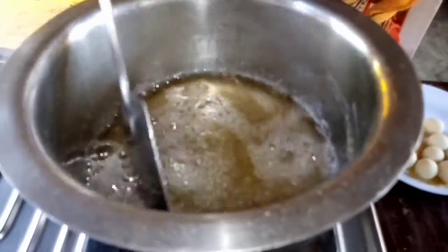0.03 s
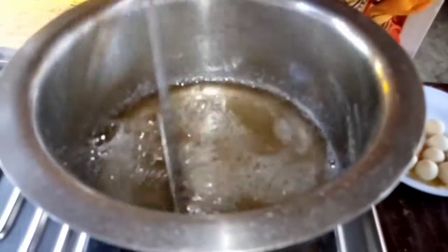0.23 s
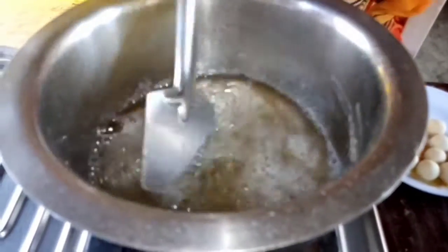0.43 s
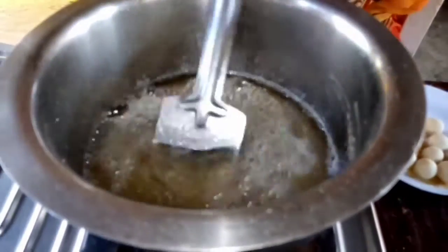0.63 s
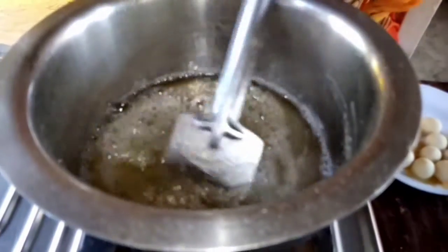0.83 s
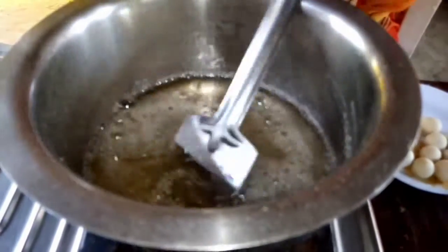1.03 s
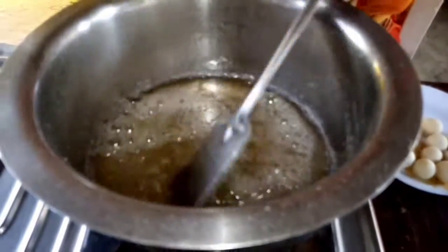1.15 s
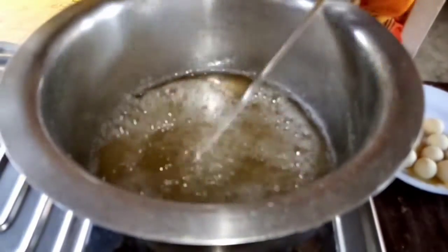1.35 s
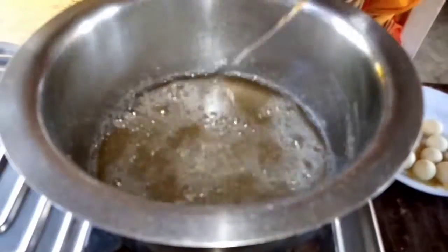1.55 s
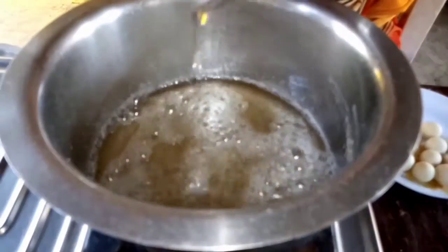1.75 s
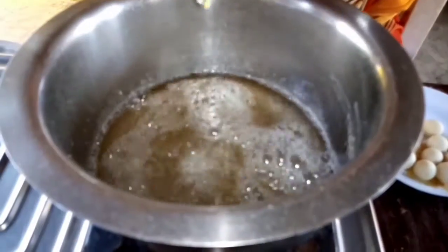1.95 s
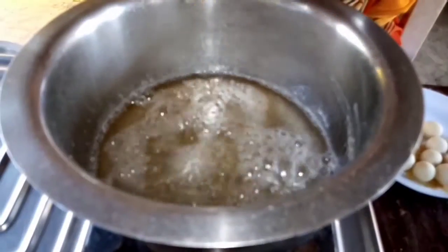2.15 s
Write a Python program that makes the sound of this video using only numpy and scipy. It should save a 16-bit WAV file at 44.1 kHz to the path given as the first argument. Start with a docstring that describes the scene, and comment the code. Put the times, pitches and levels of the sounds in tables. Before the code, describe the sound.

Sugar syrup fizzes and bubbles in a steel pot, close by. A metal spatula chatters on the bottom, clangs against the wall, then scrapes and taps lightly. The foam keeps hissing over a low stove rumble.

```python
"""A metal spatula stirs sugar syrup that fizzes and bubbles in a steel pot, close by. It strikes the syrup-
damped bottom and chatters to rest, clangs on the bare wall, then scrapes and taps along it. Bursting bubbles
keep the foam hissing; the blade sweeps a sliding resonance through the sizzle, and one faint, narrow tone
sounds. Larger bubbles plop above the stove's low rumble, and the room booms just after the knocks."""
import sys
import numpy as np
from scipy import signal
from scipy.fft import rfft, irfft
from scipy.io import wavfile

SR = 44100
rng = np.random.default_rng(int(sys.argv[2]) if len(sys.argv) > 2 else 0)


def file_out(sig):
    """Save sig as 16-bit WAV at sys.argv[1]."""
    # one column per channel
    cols = np.atleast_2d(sig).T
    # limit, then scale
    lim = np.clip(cols, -1, 1)
    pcm = np.round(lim * 32767).astype(np.int16)
    wavfile.write(sys.argv[1], SR, pcm)


N = 97020
T = np.arange(N) / SR
RING_T = T[:int(1.2 * SR)]


def undb(db):
    """Decibels to gain."""
    return 10 ** (np.asarray(db) / 20)


def level(x, db):
    """Set the rms level."""
    return x * undb(db) / np.sqrt(np.mean(x ** 2) + 1e-30)


def fader(points):
    """Gain ride through (time [s], level [dB]) points."""
    return undb(np.interp(T, *np.array(points).T))


def decay(t60):
    """Exponential tail, 60 dB down after t60 seconds."""
    return np.exp(-np.log(1000) * RING_T / t60)


def eq(x, points):
    """Unity-power EQ through (frequency [Hz], gain [dB]) points, rolling off below the first."""
    hz, db = np.array(points, float).T
    f = np.maximum(np.fft.rfftfreq(2 * N, 1 / SR), 1)
    gain = undb(np.interp(np.log(f), np.log(hz), db))
    gain /= np.sqrt(1 + (.5 * hz[0] / f) ** 4)
    cepstrum = irfft(np.log(level(gain, 0)))
    cepstrum[1:N] *= 2  # minimum phase: no ringing ahead of an attack
    cepstrum[N + 1:] = 0
    return irfft(rfft(x, 2 * N) * np.exp(rfft(cepstrum)))[:N]


def resonate(x, hz, width_hz):
    """One resonant band-pass."""
    return signal.lfilter(*signal.iirpeak(hz, hz / width_hz, fs=SR), x)


def add(out, x, start):
    """Mix a sound in from a start time."""
    i = int(start * SR)
    out[i:i + len(x)] += x[:N - i]


def clicks(per_s, spread_db):
    """Random clicks, most small and a few large."""
    impulses = (rng.random(N) < per_s / SR) * rng.choice([-1, 1], N)
    return impulses * undb(spread_db * np.minimum(rng.exponential(size=N), 4))


def crack(t60, tail_db, tail_t60):
    """A noise burst for the dense, short modes of a hit and their longer tail."""
    return rng.standard_normal(len(RING_T)) * (decay(t60) + undb(tail_db) * decay(tail_t60))


def ring(modes):
    """Modes struck once, each dying away from a random phase."""
    return sum(undb(db) * decay(t60) * np.sin(2 * np.pi * (hz * RING_T + rng.random()))
               for hz, db, t60 in modes)


# swell of the boil, for fizz and spits (time [s], level [dB])
BOIL_RIDE = [(0, 1), (.35, 4), (.52, 1), (.85, -1), (1.1, 1), (1.3, 2), (1.6, 2.5), (1.7, 1), (1.9, 2.5),
             (2.2, 1)]
# sizzling tone of the foam (frequency [Hz], gain [dB])
FIZZ_EQ = [(800, -11), (1100, -19), (1500, -11), (2200, -11.5), (2700, -4), (3500, -4), (4500, -1),
           (5500, 1), (6600, 0.5), (7300, -8), (8300, -11.5), (11000, -16), (13600, -10), (14900, -3),
           (15800, -2.5)]
POPS_PER_S = 4000


def fizz():
    """Tiny bubbles burst by the thousand, each leaving a brief hiss."""
    pops = level(clicks(POPS_PER_S, spread_db=2.5), db=-62.5)
    hiss_envelope = signal.fftconvolve(np.abs(np.tile(pops, 2)), decay(t60=.021))[N:2 * N]
    hiss = level(rng.standard_normal(N) * hiss_envelope, db=-56)
    return eq(pops + hiss, FIZZ_EQ) * fader(BOIL_RIDE)


# sparkle of snapping bubbles (frequency [Hz], gain [dB])
SPIT_EQ = [(5000, -8), (7500, -18), (10000, 1), (13600, -14.5), (14900, 7), (15800, 3)]


def spits():
    """Bubbles at the top of the foam snap open in short, bright crackles."""
    snaps = np.abs(clicks(per_s=330, spread_db=4))
    envelope = signal.fftconvolve(snaps, decay(t60=.0047))[:N]
    crackle = eq(envelope * rng.standard_normal(N), SPIT_EQ)
    return level(crackle, db=-64.5) * fader(BOIL_RIDE)


# hollow resonances of the air in the pot (frequency [Hz], width per pass [Hz], gain [dB])
AIR_MODES = [(467.4, 106, -4), (597.5, 80, 3.5), (669.6, 104, 2), (1259, 66, -4.5)]


def bubbles():
    """Larger bubbles plop and ring the air in the pot."""
    plops = clicks(per_s=250, spread_db=1)
    hollow = sum(undb(db) * resonate(resonate(plops, hz, width), hz, width)  # twice for steep sides
                 for hz, width, db in AIR_MODES)
    return level(hollow, db=-65)


# low-end weight of stove and room (frequency [Hz], gain [dB])
LOW_END_EQ = [(25, -23), (60, -8.5), (100, -6), (150, -0.5), (240, -3), (330, -17), (450, 1), (900, -34.5)]
# stove rumble, ridden up for the room's boom after the knocks (time [s], level [dB])
LOW_END_RIDE = [(0, -75), (.24, -67), (.285, -57), (.42, -66.5), (.6, -71.5), (.71, -55.5), (.87, -69),
                (1.3, -65), (1.55, -66.5), (1.85, -64), (1.98, -68), (2.15, -66)]


def stove_and_room():
    """Low stove rumble, with the room's low boom blooming just after the spatula's knocks."""
    noise = eq(rng.standard_normal(N), LOW_END_EQ)
    low_end = signal.sosfilt(signal.butter(2, 500, fs=SR, output="sos"), noise)
    return level(low_end, db=0) * fader(LOW_END_RIDE)


# the spatula chattering to rest on the bottom (time [s], level [dB])
BOTTOM_HITS = [(.2153, -2), (.2333, -4.5), (.249, -5.5), (.262, -11), (.272, -20.5), (.279, -16),
               (.286, -24.5), (.333, -21), (0.348, -21.5), (.372, -31), (0.451, -30.5)]
# tone of a knock on the bottom (frequency [Hz], gain [dB])
KNOCK_EQ = [(90, -36), (180, -23), (300, -8), (450, -6.5), (620, 3.5), (850, -3), (1060, -7.5),
            (1280, -2.5), (1600, -10.5), (2100, -7.5), (2550, -5), (3000, -6), (3600, -12.5), (4700, -2.5),
            (6700, -12.5), (7500, -18), (9000, -22), (13000, -31), (15500, -16)]
# ring of the filled pot (frequency [Hz], level [dB], 60 dB decay time [s])
POT_MODES = [(495, -6.5, 0.55), (577.5, -2.5, 1), (631, -5, 0.74), (713, 2, 0.12), (850, 4, 0.22),
             (1214, -13, 0.45), (1527, 1.5, 0.15), (1610, -6.5, 0.18), (2590, 5.5, 0.2), (2900, -21, 0.14),
             (3073.7, 8.5, 0.12), (4890, -5, 0.54), (5522.6, 2, 0.13), (6696, 2, .16)]
KNOCK_DECAY = dict(t60=.037, tail_db=-12, tail_t60=.33)
KNOCK_GAIN_DB, POT_GAIN_DB = -25.5, -43.5


def knocks():
    """Each bounce on the bottom cracks and briefly rings the filled pot."""
    attacks, rings = np.zeros((2, N))
    for start, db in BOTTOM_HITS:
        add(attacks, undb(db) * crack(**KNOCK_DECAY), start)
        add(rings, undb(db) * ring(POT_MODES), start)
    return undb(KNOCK_GAIN_DB) * eq(attacks, KNOCK_EQ) + undb(POT_GAIN_DB) * rings


# bright edge of metal meeting metal (frequency [Hz], gain [dB])
TICK_EQ = [(5000, -14), (7500, 9.5), (10000, 5), (13600, -2), (15300, 7.5)]
TICK_GAIN_DB, TICK_DB_PER_HIT_DB = -37, .7


def ticks():
    """Every hit on the bottom or the wall starts with a short, very bright tick."""
    out = np.zeros(N)
    for start, db, *_ in BOTTOM_HITS + WALL_HITS:
        tick = rng.standard_normal(len(RING_T)) * decay(t60=.025)
        add(out, undb(db * TICK_DB_PER_HIT_DB) * tick, start)
    return undb(TICK_GAIN_DB) * eq(out, TICK_EQ)


# the blade hitting the wall (time [s], clang level [dB], thud level [dB])
WALL_HITS = [(0.549, 4, -25), (.552, -2.5, -34), (0.559, 1.5, -21.5), (.682, -9.5, -10.5), (.689, -6, -11),
             (.700, -8.5, -17.5), (0.716, -3, -11.5), (.726, -23, -9.5), (.732, -8.5, -32),
             (.760, -20, -36), (0.793, -11.5, -25), (.949, -18, -19.5), (0.965, -19, -26),
             (.993, -21, -18.5), (1.064, -23, -21.5)]
# tone of a tap on the wall (frequency [Hz], gain [dB])
TAP_EQ = [(600, -15), (950, -35), (1250, -11), (1600, -21), (1900, -2.5), (2350, -17), (2600, -7.5),
          (3100, -4.5), (3900, -8), (4600, -4.5), (5400, 0.5), (6000, -2), (6650, 7), (7200, -24),
          (8200, -10.5), (8700, -21.5), (11500, -33), (15500, -22)]
# ring of the bare steel, for taps and scrapes (frequency [Hz], level [dB], 60 dB decay time [s])
STEEL_MODES = [(1025, -17, 1.35), (1235, -17.5, 0.87), (2030, -17.5, 0.37), (2338, 3.5, 0.39),
               (2355, -25, 0.71), (2944.7, -6, 0.59), (4540, -1, 0.2), (4610, -2, 0.6), (5260, -6, 0.2),
               (5360, 0.5, 0.33), (5770, -5.5, 0.41), (6303, -9.5, 0.61), (6260, -6, 0.15),
               (6767, 5.5, 0.092), (6721, -11.5, 1.1), (7330, -7.5, 0.31), (8770, -12, 0.28)]
TAP_GAIN_DB, STEEL_GAIN_DB, THUD_GAIN_DB = -33, -44.5, -28
CHOKE_S = .01  # a next hit this soon keeps the blade on the wall and chokes the ring


def taps():
    """Hits on the wall thud in the pot; the bare steel rings once the blade springs clear."""
    attacks, rings, thuds = np.zeros((3, N))
    gaps = np.diff([hit[0] for hit in WALL_HITS], append=np.inf)
    for (start, clang_db, thud_db), gap in zip(WALL_HITS, gaps):
        add(attacks, undb(clang_db) * crack(t60=.052, tail_db=-21.5, tail_t60=.56), start)
        add(rings, (gap > CHOKE_S) * undb(clang_db) * ring(STEEL_MODES), start)
        add(thuds, undb(thud_db) * crack(**KNOCK_DECAY), start)
    clangs = undb(TAP_GAIN_DB) * eq(attacks, TAP_EQ) + undb(STEEL_GAIN_DB) * rings
    thuds = resonate(eq(thuds, KNOCK_EQ), hz=740, width_hz=700)
    return clangs + undb(THUD_GAIN_DB) * thuds


# the blade dragging on the wall (start [s], length [s], level [dB])
SCRAPE_STROKES = [(0.591, 0.078, -46.5), (0.659, 0.089, -48), (0.744, 0.073, -50.5), (0.939, 0.052, -51.5),
                  (1.198, 0.072, -56), (1.379, 0.045, -57.5)]
# rasp of the edge on steel (frequency [Hz], gain [dB])
SCRAPE_EQ = [(700, -34), (1000, -30), (1250, 0), (1600, -44), (2100, -30), (2340, -23), (2550, -22),
             (2950, -2.5), (3700, -15), (4600, 5.5), (5500, -0.5), (6600, 1), (7300, -7), (9600, -18.5),
             (13000, -20), (15500, -8.5)]
SCRAPE_FADE_S, SCRAPE_RING_DB = .005, -4.5


def scrapes():
    """The edge sticks and slips, rasping and keeping the steel ringing."""
    force = np.zeros(N)
    for start, length, db in SCRAPE_STROKES:
        inside_s = np.minimum(T - start, start + length - T)
        force += undb(db) * np.clip(inside_s / SCRAPE_FADE_S, 0, 1)
    slips = force * level(clicks(per_s=900, spread_db=3), db=0)
    burst = crack(t60=.05, tail_db=-23, tail_t60=.2275)
    rasp = eq(burst, SCRAPE_EQ)[:len(RING_T)] / np.linalg.norm(burst)
    steel = ring(STEEL_MODES)
    steel *= undb(SCRAPE_RING_DB) / np.linalg.norm(steel)
    return signal.fftconvolve(slips, rasp + steel)[:N]


# the blade sweeping a resonance through the sizzle, and one faint, narrow tone near 1.3 kHz # (start [s],
# length [s], glide from [Hz], glide to [Hz], width [Hz], level [dB])
SWEEPS = [(0.775, 0.22, 3660, 3270, 700, -56), (1.006, 0.053, 3150, 3200, 199, -58),
          (1.152, 0.15, 4830, 4650, 348, -57), (1.256, 0.19, 3260, 3600, 710, -54),
          (1.35, 0.29, 2920, 2800, 607, -63), (1.667, 0.143, 1310, 1335, 29.6, -67),
          (1.807, 0.15, 3402, 3399, 200, -64), (1.949, 0.15, 4700, 4160, 200, -55),
          (2.044, 0.26, 3960, 3220, 500, -59.5)]


def swishes_and_tone():
    """The blade sweeps a sliding resonance through the sizzle; one narrow band sounds as a faint tone near 1.3
    kHz."""
    out = np.zeros(N)
    crackle = clicks(POPS_PER_S, spread_db=2.2)
    for start, length, from_hz, to_hz, width_hz, db in SWEEPS:
        progress = T[T < length] / length
        glide_hz = from_hz + (to_hz - from_hz) * progress
        carrier = np.exp(2j * np.pi * np.cumsum(glide_hz) / SR)
        pops = np.roll(crackle, -int(start * SR))[:len(progress)]
        lowpass = signal.butter(1, width_hz / 2, fs=SR, output="sos")
        band = (signal.sosfilt(lowpass, pops / carrier) * carrier).real  # a gliding band-pass
        swell = np.sin(np.pi * progress ** .56)
        add(out, level(band, db) * swell, start)
    return out


def scene():
    """The spatula over the boiling syrup and the stove, close up in mono."""
    spatula = knocks() + taps() + ticks() + scrapes()
    return (spatula + fizz() + spits() + swishes_and_tone() + bubbles() + stove_and_room())[None]


HIGH_CUT_HZ = 15600


def record(dry):
    """A steep high cut takes off the very top."""
    return signal.sosfilt(signal.ellip(10, .2, 70, HIGH_CUT_HZ, fs=SR, output="sos"), dry)


dry = scene()
out = record(dry)
file_out(out)
```